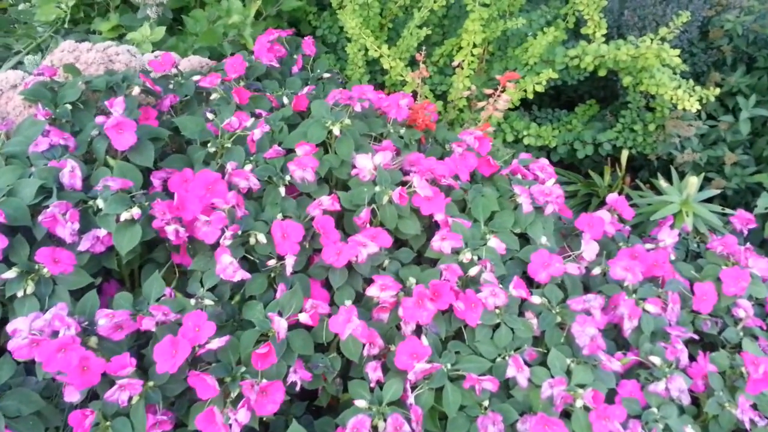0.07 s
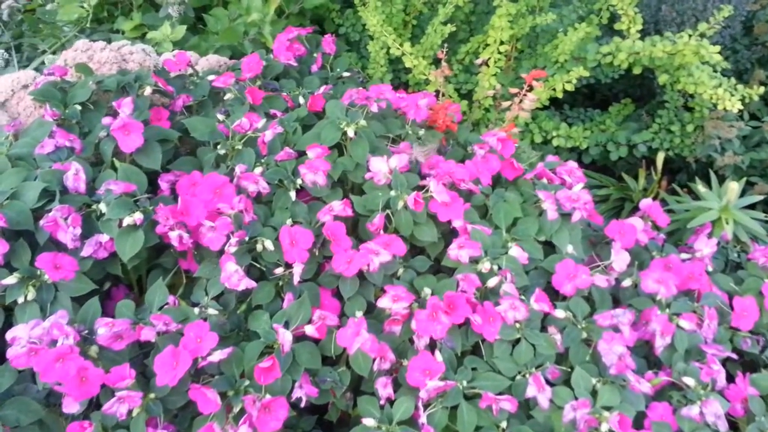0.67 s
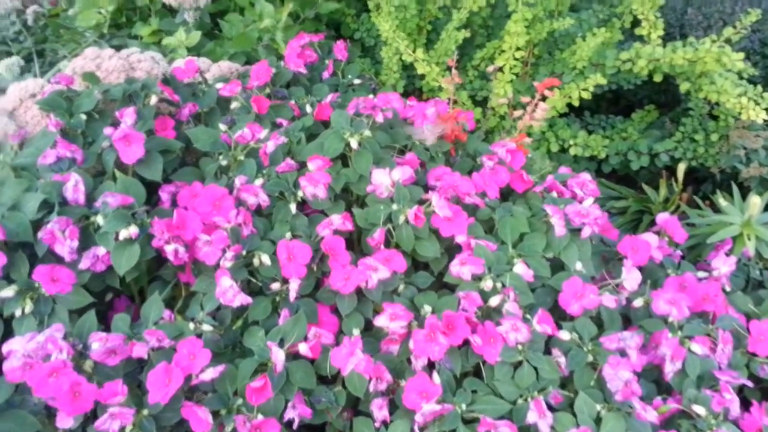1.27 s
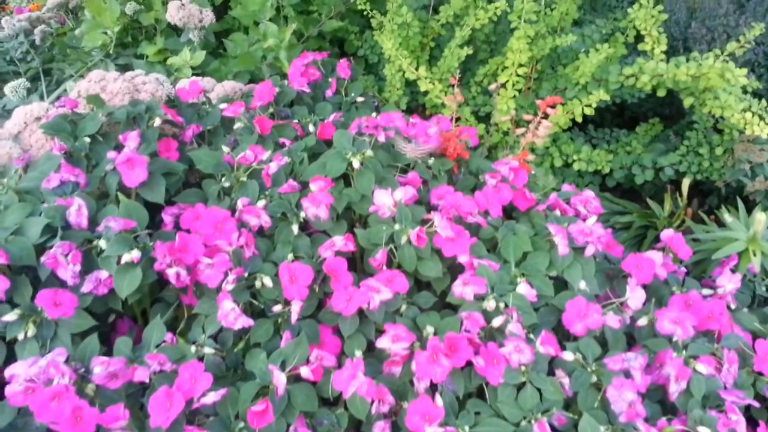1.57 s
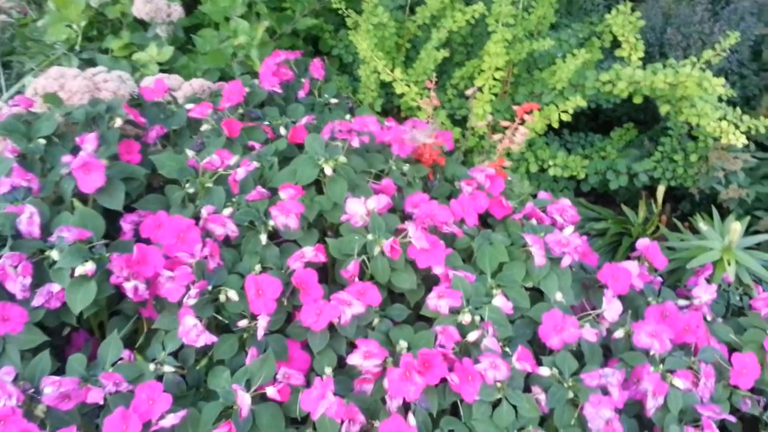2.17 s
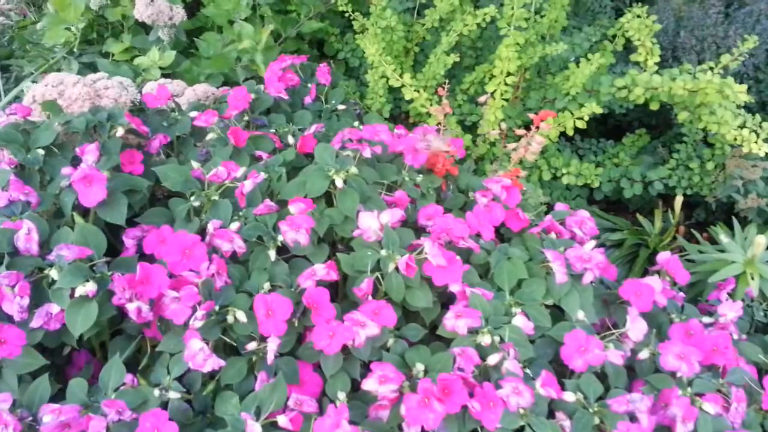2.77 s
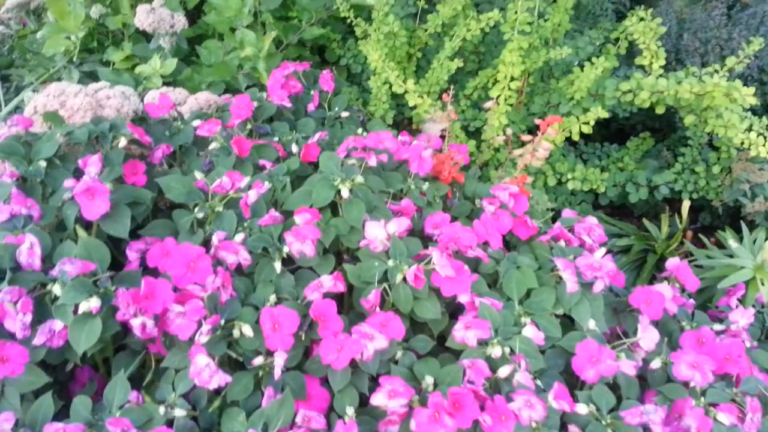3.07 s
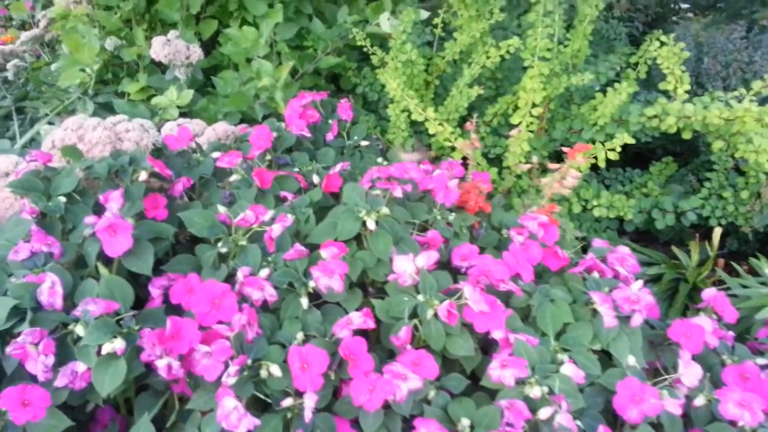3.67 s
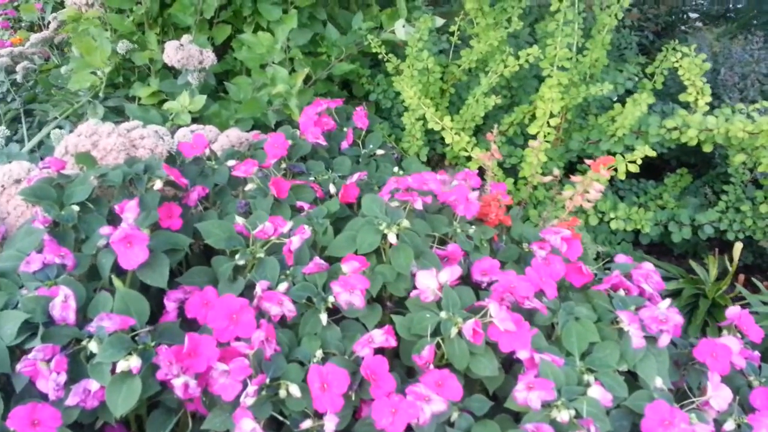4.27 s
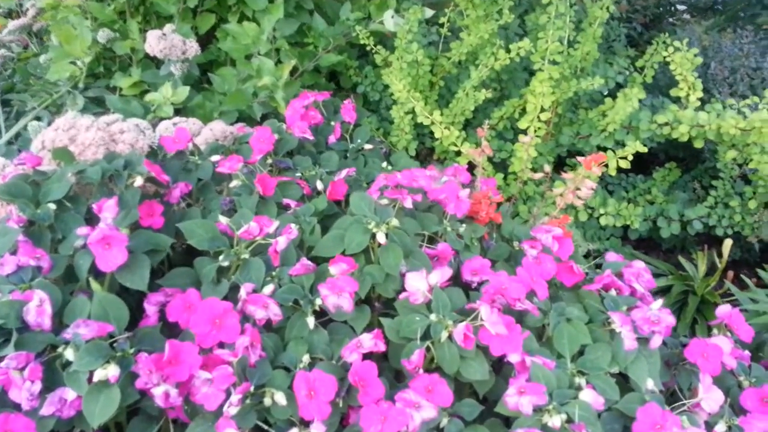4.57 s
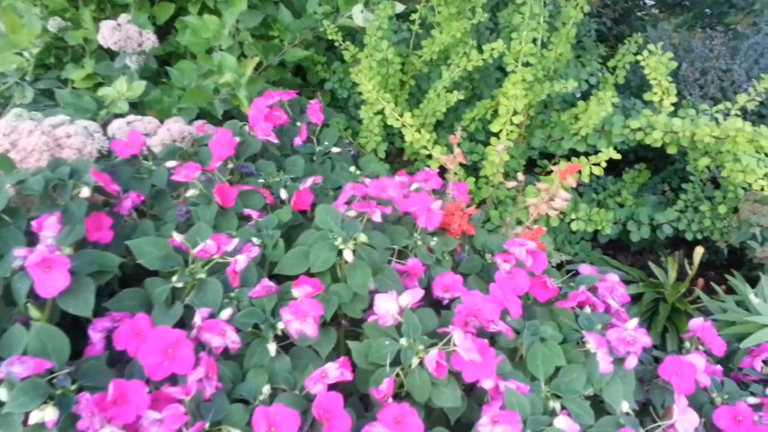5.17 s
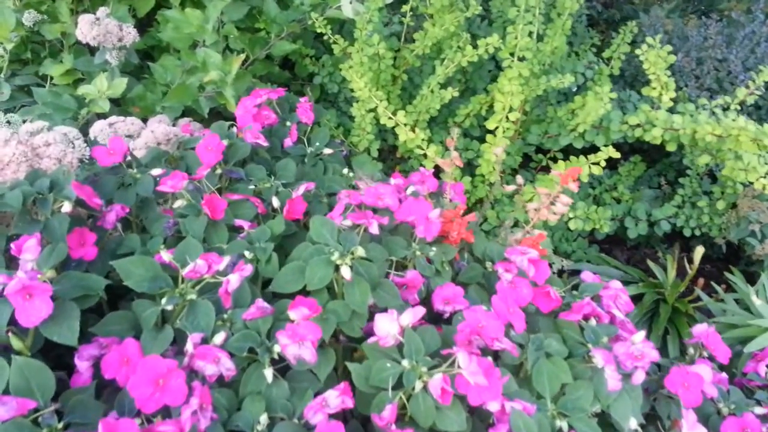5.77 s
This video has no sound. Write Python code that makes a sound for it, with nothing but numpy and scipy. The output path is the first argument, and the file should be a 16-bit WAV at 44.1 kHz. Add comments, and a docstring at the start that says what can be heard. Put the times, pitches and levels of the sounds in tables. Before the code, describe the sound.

Crickets trill briefly as a nearby cicada winds up into a loud whining drone, joined by a second, with faint distant traffic.

```python
"""A garden, on the stereo microphones of a hand-held camera. Close by on the right a cicada buckles its
tymbals into a drone that swells, holds and starts to sag; a second cicada joins in. At first two crickets
trill with their wings and a small insect ticks, over a far insect chorus. Distant traffic rumbles and
hums; the hand bumps the camera, and something rustles briefly on the left."""
import sys
import numpy as np
from scipy.fft import rfft, irfft, next_fast_len
from scipy.io import wavfile
from scipy.ndimage import map_coordinates

SR = 44100
rng = np.random.default_rng(int(sys.argv[2]) if len(sys.argv) > 2 else 0)


def dump(signal):
    """Clip the signal to [-1, 1] and save it as 16-bit WAV at the path in sys.argv[1]."""
    limited = np.clip(np.atleast_2d(signal).T, -1, 1)
    pcm = np.round(limited * 32767).astype(np.int16)
    wavfile.write(sys.argv[1], SR, pcm)


N = 256220
TIME = np.arange(N) / SR


def near_cicada(first_hz=182.15, full_hz=186.3, tires_s=4.9, sag_hz_per_s2=3.8, swell_s=1.98):
    """Close, on the right: two tymbals buckle in turn; the abdomen rings near 8 kHz and adds a whine."""
    # buzz at the microphones: multiple of the tymbal rate, relative left level/dB, right level/dB
    buzz_colour = [(24, -39, -43), (27, -26, -39), (29, -31, -34), (30, -24, -23), (31, -24, -27),
                   (32, -27, -23), (33, -28, -28), (34, -25, -20), (35, -32, -30), (36, -20, -17),
                   (37, -28, -19), (38, -17, -8), (39, -21, -16), (40, -22, -15), (41, -25, -14),
                   (46, -27, -16), (47, -24, -12), (48, -34, -24), (49, -35, -21), (50, -37, -24),
                   (51, -22, -13), (52, -37, -24), (53, -28, -19), (57, -42, -37), (62, -43, -40),
                   (70, -44, -39), (76, -53, -47)]
    # partials lifted by the abdomen: multiple of the tymbal rate
    ringing = [42, 43, 44, 45]
    # the lowest of these, near 7.75 kHz: t/s, relative level/dB
    lower_whine = [(0, -52), (.5, -53), (.8, -35), (1.1, -31), (1.9, -27.5), (2.15, -23.5), (2.6, -21.5),
                   (2.9, -26), (3.5, -29.5), (4.3, -20.5), (4.55, -21.5), (5.08, -20), (5.33, -27),
                   (5.81, -22)]
    # the highest, near 8.3 kHz: t/s, relative level/dB
    upper_whine = [(0, -63.5), (1.1, -53), (1.5, -30.5), (1.9, -30), (2.25, -26.5), (2.6, -17),
                   (2.98, -19.5), (3.1, -20), (3.25, -16), (3.8, -16.5), (4.35, -18), (4.55, -20),
                   (4.8, -21), (5.28, -22.5), (5.38, -17), (5.53, -22), (5.62, -25.5), (5.81, -30.5)]
    # partials that swell or fade as the camera drifts: multiple, start/s, end/s, change/dB
    flares = [(28, 3.0, 4.0, 10), (31, 1.5, 2.55, 6), (32, .8, 2.45, -7), (32, 5.28, 6, 17),
              (34, .9, 3.1, -7), (37, 4.1, 5.45, 6), (38, 1.25, 2.2, -5), (38, 4.8, 6, -12),
              (39, 3.6, 4.95, 9), (41, 3.2, 4.55, 7), (43, .4, 1.65, 5), (43, 1.75, 2.6, -6),
              (44, 1.25, 2.7, 12), (46, 1.3, 4.3, 5), (46, 1.55, 2.9, 9), (47, -.3, .85, 7),
              (47, 3.2, 4.3, 4), (48, 1.5, 3.0, 8), (49, -.3, 1.1, 11), (49, .85, 2.1, 5),
              (49, 1.24, 2.72, 14), (49, 1.85, 2.7, 3), (49, 4.55, 5.6, 13), (50, 5.2, 5.8, 15),
              (52, 2.45, 4.1, 6), (52, 5.2, 6, 9), (56, 5.2, 5.85, 12), (57, 4.45, 5.42, 12)]
    # rasp of uneven clicks: f/Hz, relative left density/dB, right density/dB
    rasp_colour = [(4000, -63, -113), (5470, -12, -7), (6640, -22, -7), (7180, -4, 12.5), (7600, -4, 11),
                   (8550, -13, 15), (8500, -17, -5), (9200, -14, 1), (10300, -17, -5), (11000, -21, -14),
                   (12600, -33, -24), (14000, -46, -55)]
    rate = first_hz + (full_hz - first_hz) * effort(start_s=0, wind_up_s=3.3)
    rate -= sag_hz_per_s2 * np.maximum(TIME - tires_s, 0) ** 2  # it tires and slows ever faster
    turns = cycles(rate, jitter=.0005)
    buzz_db = np.interp(TIME, [0, swell_s], [-43.5, -24.5])
    buzz_db += .5 * np.maximum(TIME - swell_s, 0)  # creeps up after the swell
    head_start_db = 12 * np.maximum(1 - TIME / swell_s, 0)
    buzz = np.zeros((2, N))
    for k in range(24, 77):
        if k in ringing:
            continue
        comb_db = -1.5 * (-1) ** k * (k > 53)  # the tymbals interfere: high odd partials are strong
        sizzle_db = head_start_db * np.clip((k - 55) / 12, 0, 1)  # the top sizzles from the start
        gain = amp(along(buzz_colour, np.array([k])) + comb_db + sizzle_db) * flare(flares, k)
        echoes = [.8, .6] if any(row[0] == k for row in flares) else [1.2, 1.4]  # left, right
        buzz += gain * partial(turns, k, echoes, shifts_per_s=4)
    lower_db, upper_db = curve(lower_whine), curve(upper_whine)
    mean_db = (lower_db + upper_db) / 2
    ring_db = [lower_db, mean_db - 5, mean_db - 10.5, upper_db]  # the inner two follow, weaker
    ring = sum(amp(db) * flare(flares, k) * partial(turns, k, echoes=[2, .12], shifts_per_s=5)
               for k, db in zip(ringing, ring_db))
    whine = stereo(-21, -.5) * ring
    # no two clicks are alike: a rasp that pulses twice a cycle
    rasp = unit(noise(rasp_colour) * (1 + .2 * np.cos(2 * np.pi * 2 * turns)))
    flutter_db = .35 * wobble(20)  # moving air between the tree and the microphones
    return amp(flutter_db) * (whine + amp(buzz_db) * (buzz + amp(-7) * rasp))


def second_cicada(first_hz=179.8, full_hz=189.65, first_db=-46.5, full_db=-24.5):
    """Another cicada winds up: effort raises its level and its pitch, which crosses that of the first."""
    # its buzz at the microphones: f/Hz, relative left level/dB, right level/dB
    buzz_colour = [(4400, -30, -36), (5600, -10, -13), (6300, -16, -15), (7300, -12, -5), (7800, -10, 0),
                   (8300, -16, -7), (8800, -20, -12), (9300, -20, -10), (10500, -30, -23),
                   (14000, -46, -40)]
    # partials that swell for a while: multiple, start/s, end/s, change/dB
    flares = [(39, 4.55, 5.3, 10), (41, 5.2, 6, 4)]
    drive = effort(start_s=3.8, wind_up_s=1.1)
    rate = first_hz + (full_hz - first_hz) * drive
    turns = cycles(rate, jitter=.00094)
    buzz = np.zeros((2, N))
    for k in range(26, 60):
        gain = amp(along(buzz_colour, np.array([k * rate[-1]]))) * flare(flares, k)
        buzz += gain * partial(turns, k, echoes=1.0, shifts_per_s=4)
    return (drive > 0) * amp(first_db + (full_db - first_db) * drive) * unit(buzz)


def partial(turns, k, echoes, shifts_per_s, left_lag_s=.00047, abdomen_hz=8100, width_hz=720):
    """Tymbal partial k at both microphones: direct sound plus a share of shifting echoes off leaves."""
    coarse_s = np.arange(0, N, SR // 50) / SR
    knots = rng.standard_normal((4, 64))
    paths = np.array([map_coordinates(row, [coarse_s * shifts_per_s], mode="mirror") for row in knots])
    reflected = np.reshape(echoes, (-1, 1)) * (paths[:2] + 1j * paths[2:]) / np.sqrt(2)
    hz = k * turns[-1] / TIME[-1]
    direct = np.exp(-2j * np.pi * hz * np.array([[left_lag_s], [0]]))
    direct *= 1j ** (k % 2)  # one click from each tymbal: odd partials lead by a quarter turn
    direct *= np.exp(-2j * np.arctan((hz - abdomen_hz) / width_hz))  # the abdomen rings after each click
    arrival = direct + reflected
    arrival /= np.abs(arrival) ** .5  # softens the peaks and dips
    gain = np.array([np.interp(TIME, coarse_s, unit(side)) for side in arrival])
    return np.sqrt(2) * np.real(gain * np.exp(2j * np.pi * k * turns))


def effort(start_s, wind_up_s):
    """A cicada's effort: 0 as it starts, closing in on 1."""
    return 1 - np.exp(-np.maximum(TIME - start_s, 0) / wind_up_s)


def flare(table, k, ramp_s=.28):
    """Gain of partial k as it swells or fades for a while."""
    return amp(sum(db * np.clip(np.minimum(TIME - start, end - TIME) / ramp_s, 0, 1)
                   for multiple, start, end, db in table if multiple == k))


def crickets():
    """On the right: a high trill that fades away and a lower, faster one that slows and breaks off."""
    high_db = -33 + release(from_s=1.6, db_per_s=16)
    low_db = -43.5 + release(from_s=1.27, db_per_s=400)
    high = cricket(stroke_hz=np.full(N, 39.5), db=high_db, first_s=.003, start_hz=7500, turn_hz=8440,
                   duty=.88, rough=.25, left_db=-24, octave_db=-60)
    low = cricket(stroke_hz=87 - 6.8 * TIME, db=low_db, first_s=0, start_hz=6150, turn_hz=5720,
                  duty=.65, rough=.6, left_db=-12, octave_db=-17)
    return high + low


def cricket(stroke_hz, db, first_s, start_hz, turn_hz, duty, rough, left_db, octave_db):
    """Each wing stroke is one short note that glides out and partly back; grass smears it."""
    strokes = np.cumsum(stroke_hz) / SR - first_s * stroke_hz[0] + .014 * wobble(25)
    progress = np.minimum(strokes % 1 / duty, 1)
    hz = start_hz + (turn_hz - start_hz) * np.sin(np.pi * progress * 5 / 6)
    phase = 2 * np.pi * np.cumsum(hz) / SR + rough * np.array([wobble(650), wobble(700)])
    envelope = np.abs(np.sin(np.pi * progress)) ** .7
    notes = envelope * (np.sin(phase) + amp(octave_db) * np.sin(2 * phase))
    return amp(db + .5 * wobble(40.4)) * stereo(left_db, 0) * unit(notes)


def ticking_insect(ticks_per_s=121, tick_s=.0012):
    """A small insect on the right ticks rapidly at first, then sinks into the chorus."""
    # noise of a tick: f/Hz, relative density/dB
    tick_colour = [(4500, -45), (6300, -16), (7000, 3), (7900, -1), (9000, -11), (10200, -23), (13000, -34)]
    age = cycles(np.full(N, ticks_per_s), jitter=.07) % 1 / ticks_per_s
    ticks = unit(noise(tick_colour) * age * np.exp(-2 * age / tick_s))
    return amp(-35.5 + release(from_s=.1, db_per_s=16)) * stereo(-16, 0) * ticks


def handling_bumps(thud_cycles=.67, rub_rise_s=.0047, rub_decay_s=.14, low_cut_hz=38):
    """Right at the microphones: each nudge of the soft hand gives a dull thud, then a little rubbing."""
    # bumps, mostly the hand on the camera body: t/s, relative level/dB, f/Hz, left minus right/dB
    nudges = [(.852, -39, 86, -12), (.892, -43, 81, -2), (1.902, -44.5, 116.5, 6), (1.932, -38.5, 76, -8),
              (2.661, -35.5, 80, -25), (3.014, -35.5, 94, -25), (3.075, -38, 90, -25),
              (3.137, -35.5, 131, -27), (3.322, -23.5, 181.8, -31), (3.346, -31, 120.5, -25),
              (3.365, -30, 135, -25), (3.378, -42, 420, -17), (3.394, -37, 116, -25),
              (3.426, -37, 110, -25), (3.453, -35, 60.5, -25), (3.489, -31, 120.7, -25),
              (3.523, -37, 125, -25), (3.552, -40, 110, -25), (3.766, -32, 72.5, -30),
              (3.794, -27.5, 84, -27), (3.867, -30, 139.9, -28), (5.382, -39.5, 59, -15)]
    bumps = np.zeros((2, N))
    for s, db, hz, pan_db in nudges:
        age = TIME - s
        thud = np.exp(-(age * hz / thud_cycles) ** 2) * np.sin(2 * np.pi * hz * age)
        after = np.maximum(age, 0)
        rub = np.minimum(after / rub_rise_s, 1) * np.exp(-after / rub_decay_s) * wobble(3 * hz)
        bumps += amp(db + 3) * unit(stereo(pan_db / 2, -pan_db / 2)) * (thud + amp(-20) * rub)
    return filtered(bumps, lambda hz: hz ** 4 / (hz ** 4 + low_cut_hz ** 4))


def rustles(tick_t60_s=.033):
    """Close, on the left: two soft brushing sounds with a few crisp ticks in them."""
    # swells of noise: t/s, relative level/dB, half length/s
    brushes = [(5.54, -49, 0.017), (5.608, -41.5, 0.037)]
    # their noise: f/Hz, relative density/dB
    brush_colour = [(500, -6), (1400, -5), (2000, 4), (2800, -2), (4000, 2), (8000, -11), (14000, -22)]
    # ticks: t/s, left peak level/dB, f/Hz
    crisp_ticks = [(5.539, -43, 1970), (5.592, -34, 2110), (5.603, -47, 2270), (5.617, -39, 3780)]
    swell = sum(amp(db) * np.exp(-((TIME - s) / width) ** 2) for s, db, width in brushes)
    ticks = np.zeros(N)
    for s, db, hz in crisp_ticks:
        age = np.maximum(TIME - s, 0)
        envelope = (age > 0) * amp(db - 60 * np.minimum(age / tick_t60_s, 2))
        ticks += envelope * np.sin(2 * np.pi * hz * age + .76 * wobble(1500))
    return stereo(0, -9) * (swell * noise(brush_colour) + ticks)


def insect_chorus(level_db=-32, fade_db_per_s=.13):
    """Far off, countless insects merge into a shimmering hiss that eases very slightly."""
    # their hiss: f/Hz, relative left density/dB, right density/dB
    hiss_colour = [(2790, -40.5, -125), (3790, -32.5, -78), (4333, -23.5, -29), (4970, -16.5, -23.5),
                   (5640, -12.5, -20), (6520, -20, -14), (7120, -24, -9), (7400, -15, -5.5),
                   (8400, -28, -4.5), (8400, -26, -14.5), (8800, -32, -13.5), (10000, -36, -29),
                   (12000, -39, -32), (13800, -52, -44)]
    shimmer_db = .75 * wobble(9.8) + .77 * wobble(90)
    return amp(level_db - fade_db_per_s * TIME + shimmer_db) * noise(hiss_colour)


def traffic(level_db=-50, mono_hz=350):
    """A distant street: a low rumble with a few wavering hums and one engine pulling away."""
    # rumble: f/Hz, relative density/dB
    rumble_colour = [(20, -11), (35, -13), (55, -5), (85, 2), (125, -1.5), (210, -7), (280, -10.5),
                     (450, -13), (700, -16.5), (1300, -17), (2000, -21.5), (2700, -43.5), (4000, -37),
                     (8000, -44)]
    # its balance at the microphones: f/Hz, left minus right/dB
    balance = [(60, -3), (200, 0), (600, 4.5), (2500, 6)]
    # faint hums: f/Hz, starting level/dB
    hums = [(80, -67), (118, -64), (415, -66.5)]
    rumble = noise(rumble_colour)
    # long waves reach both microphones alike
    crossfeed = filtered(rumble[::-1], lambda hz: .3 / (1 + (hz / mono_hz) ** 4))
    rumble = filtered(unit(rumble + crossfeed), lambda hz: amp(along(balance, hz) * [[.5], [-.5]]))
    hum = sum(amp(db + 1.5 * wobble(3.25)) * unit(np.sin(2 * np.pi * hz * TIME + wobble(6.8)))
              for hz, db in hums)
    hum *= amp(np.interp(TIME, [4.4, 5.2], [0, -8]))  # the hums sink into the rumble
    engine = far_engine()
    sway_db = .45 * (wobble(4.06) + wobble(20))
    return amp(level_db + sway_db) * rumble + hum + engine


def far_engine():
    """An engine changes gear, gains speed and draws away; two firing harmonics leave its exhaust."""
    # firing rate: t/s, f/Hz
    speed = [(.25, 126.6), (.45, 101.6), (2.8, 116.3), (4.1, 117.2), (4.95, 137.7), (5.3, 167.7),
             (5.8, 176.2)]
    # what the exhaust lets through: f/Hz, level before the fade/dB
    exhaust = [(105, -64), (130, -56), (210, -61), (240, -70)]
    firing_hz = curve(speed)
    phase = 2 * np.pi * np.cumsum(firing_hz) / SR + .5 * wobble(8.3)
    drone = sum(amp(along(exhaust, k * firing_hz)[0] + 3.4 * wobble(8)) * unit(np.sin(k * phase))
                for k in (1, 2))
    return drone * amp(release(from_s=4.3, db_per_s=2))


def amp(db):
    """Decibels to gain."""
    return 10 ** (np.asarray(db) / 20)


def stereo(left_db, right_db):
    """Gains at the two microphones."""
    return amp([[left_db], [right_db]])


def unit(x):
    """x at rms 1."""
    return x / np.sqrt(np.mean(np.abs(x) ** 2) + 1e-20)


def along(spectrum, hz):
    """Each level column of a spectrum, read on a log frequency axis."""
    freqs, *columns = np.transpose(spectrum)
    return np.array([np.interp(np.log(hz + 1e-3), np.log(freqs), column) for column in columns])


def curve(points):
    """Straight lines through (time, value) points, one value per sample."""
    return np.interp(TIME, *np.transpose(points))


def release(from_s, db_per_s):
    """Level in dB of a sound that holds, then fades evenly."""
    return -db_per_s * np.maximum(TIME - from_s, 0)


def wobble(rate):
    """A smooth random curve of unit size, rate knots a second."""
    knots = rng.standard_normal(int(N * rate / SR) + 4)
    fine = np.arange(0, len(knots) - 1, 1 / 8)
    return np.interp(TIME * rate, fine, map_coordinates(knots, [fine]))


def cycles(rate, jitter):
    """Running count of click cycles, each one slightly early or late."""
    return np.cumsum(rate) / SR + jitter * wobble(150)


def filtered(x, response):
    """x shaped by a gain that depends on frequency."""
    size = next_fast_len(N + SR // 4)
    return irfft(rfft(x, size) * response(np.fft.rfftfreq(size, 1 / SR)), size)[..., :N]


def noise(spectrum):
    """Coloured noise of rms 1, unrelated at the two microphones."""
    return unit(filtered(rng.standard_normal((2, N)), lambda hz: amp(along(spectrum, hz))))


def scene():
    """The garden from the camera: insects, the far street, handling and a rustle."""
    insects = near_cicada() + second_cicada() + crickets() + ticking_insect() + insect_chorus()
    return insects + traffic() + handling_bumps() + rustles()


def record(dry, top_hz=14400):
    """The camera keeps nothing above its band limit."""
    return filtered(dry, lambda hz: hz < top_hz)


dry = scene()
out = record(dry)
dump(out)
```